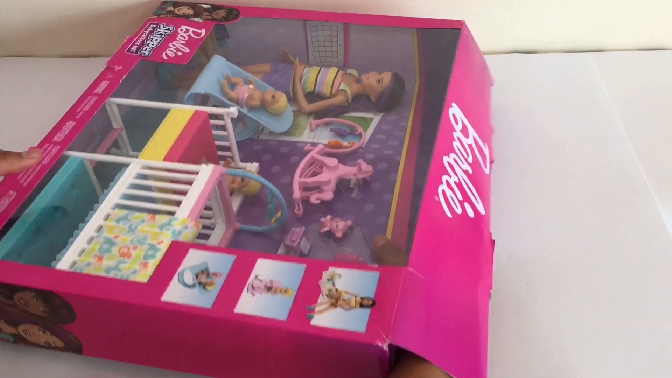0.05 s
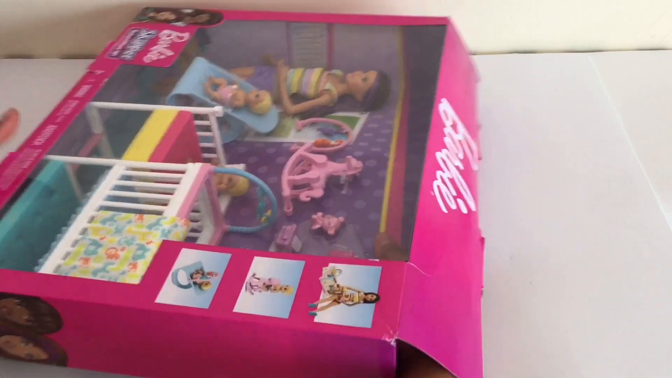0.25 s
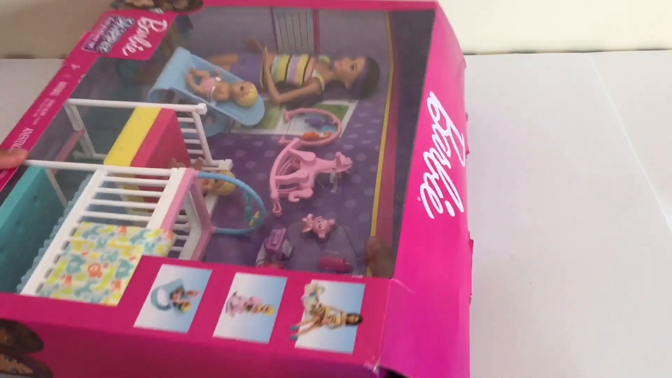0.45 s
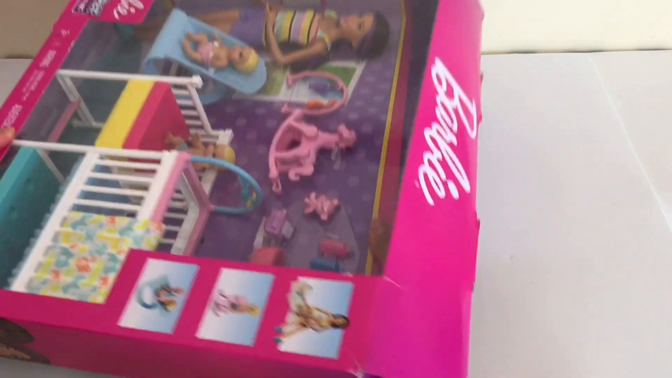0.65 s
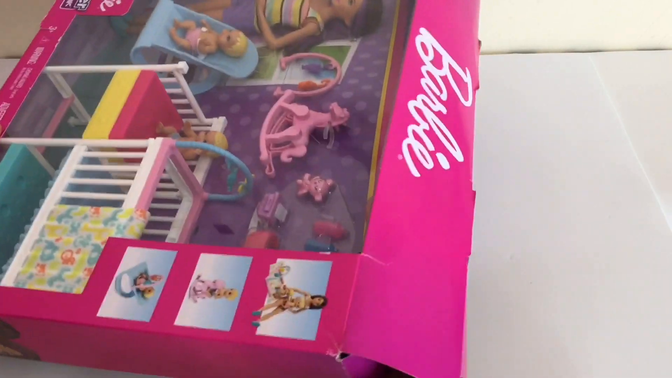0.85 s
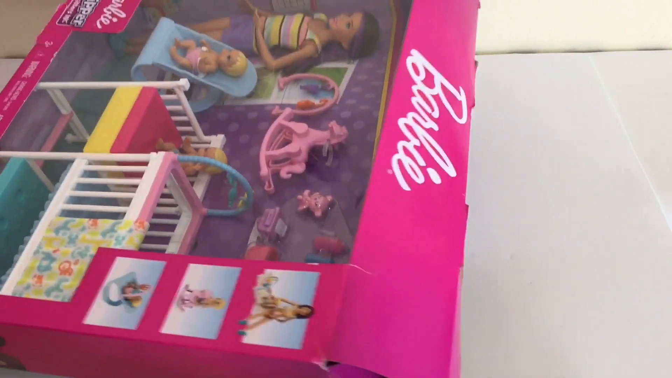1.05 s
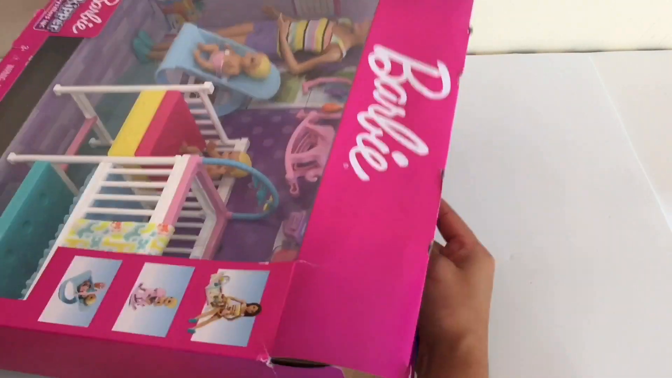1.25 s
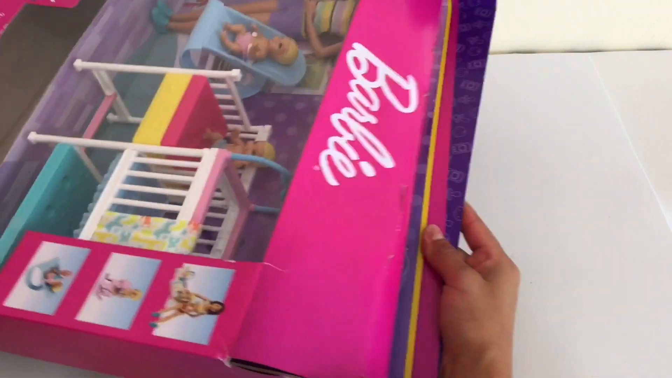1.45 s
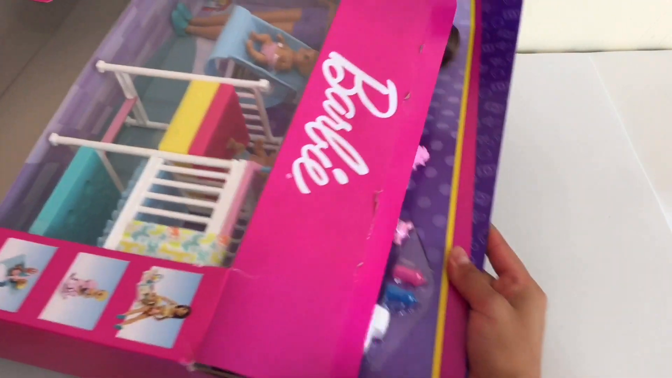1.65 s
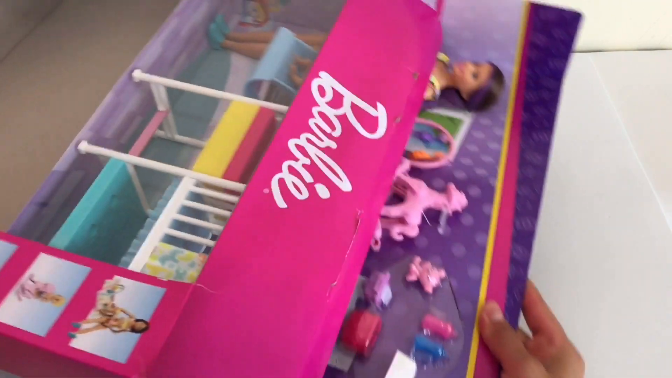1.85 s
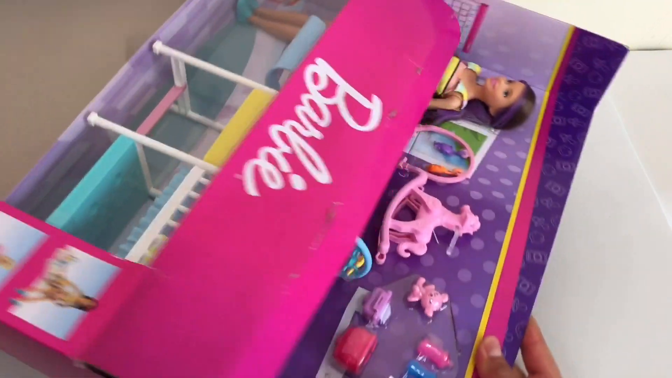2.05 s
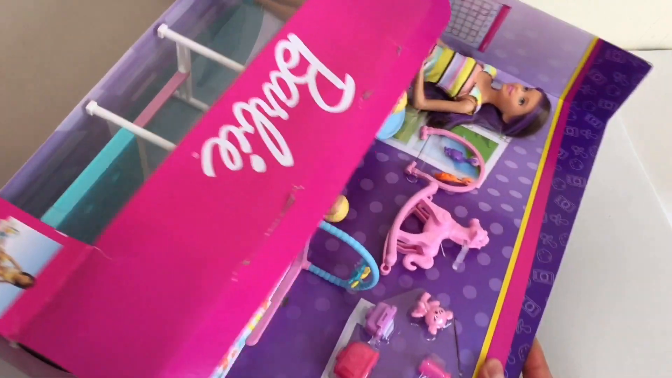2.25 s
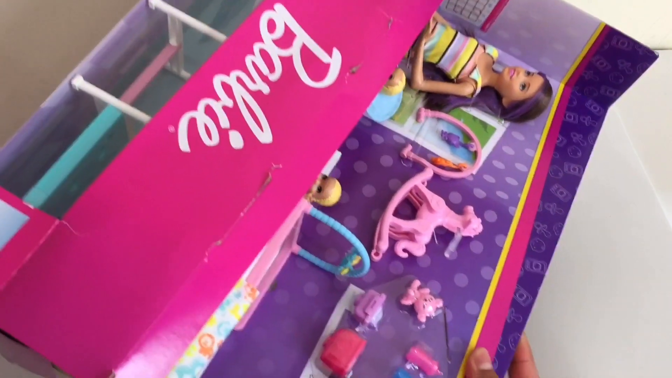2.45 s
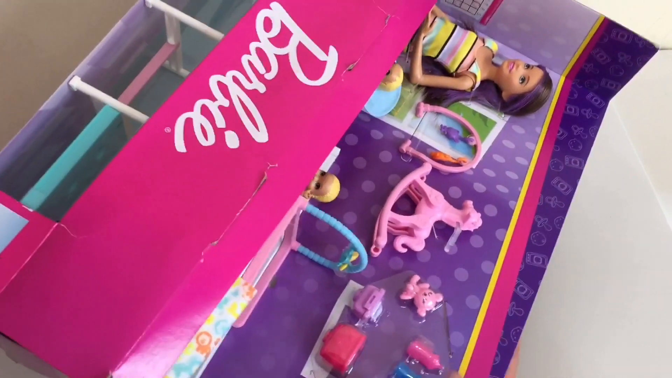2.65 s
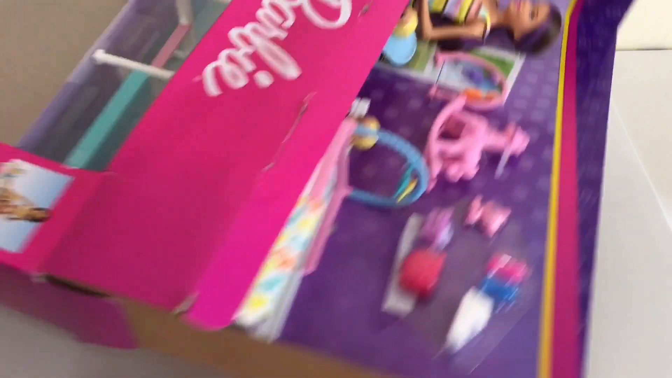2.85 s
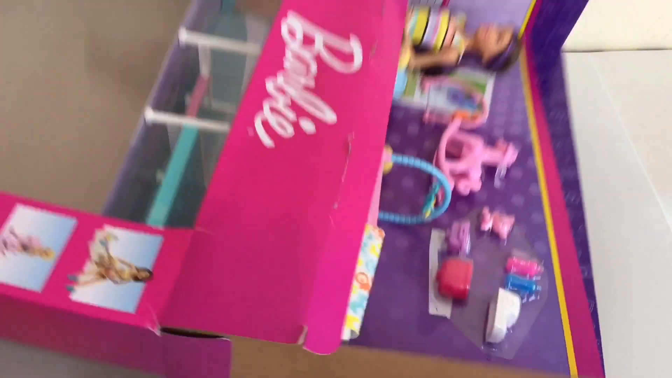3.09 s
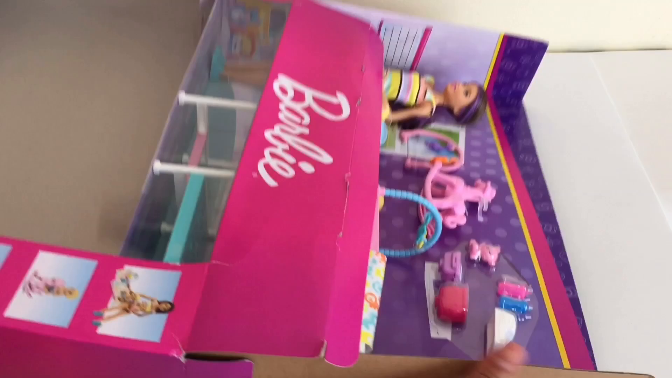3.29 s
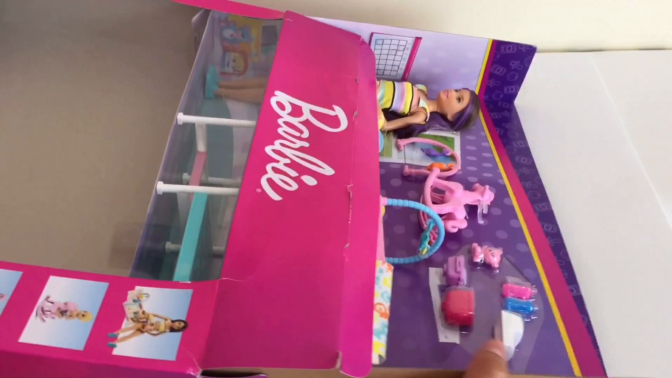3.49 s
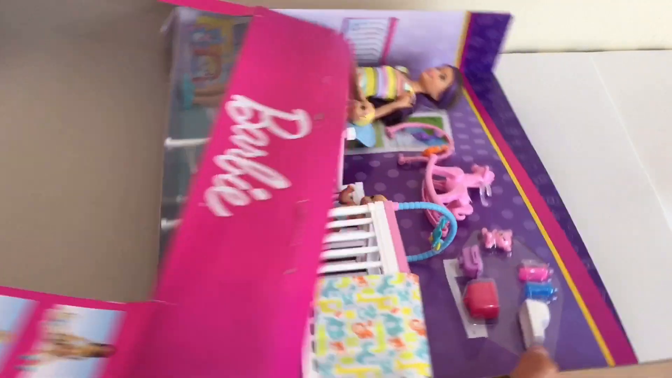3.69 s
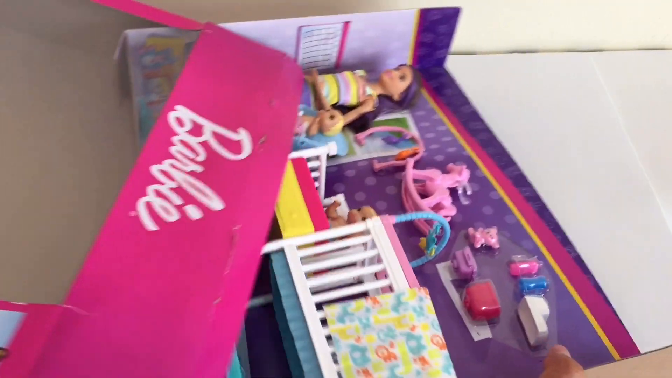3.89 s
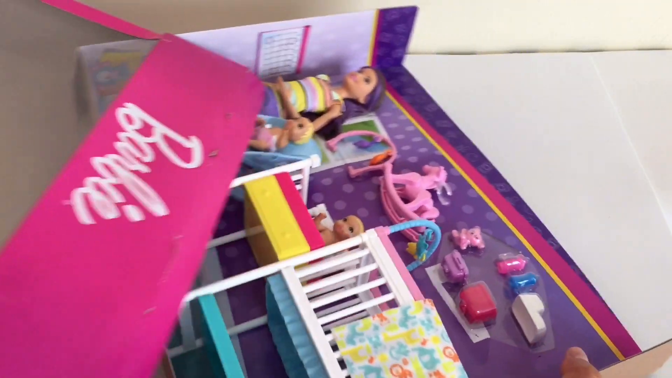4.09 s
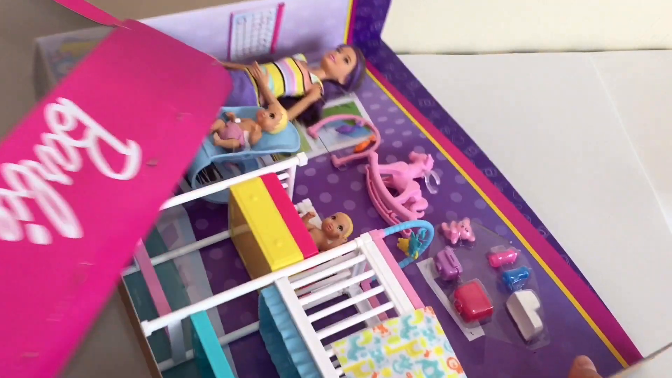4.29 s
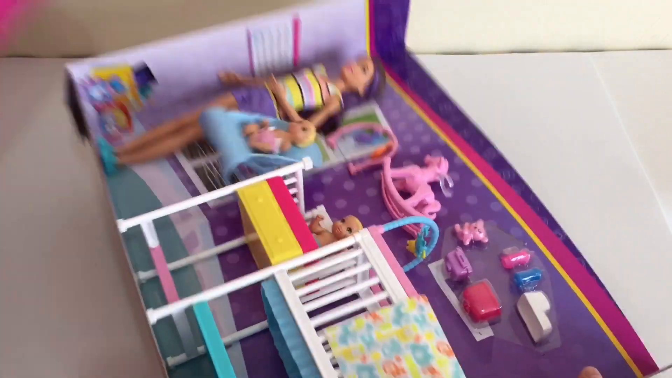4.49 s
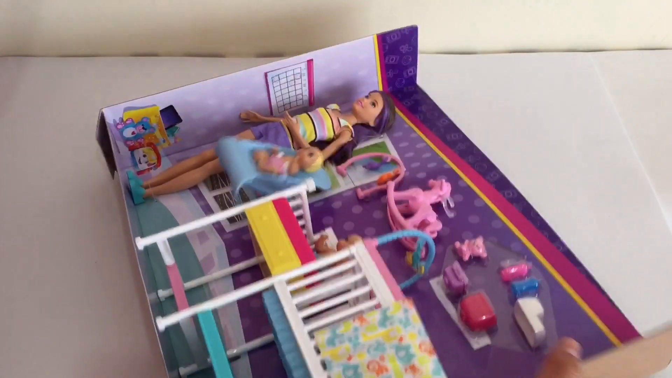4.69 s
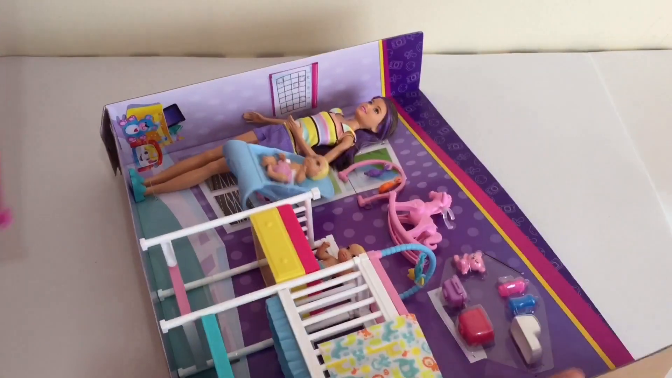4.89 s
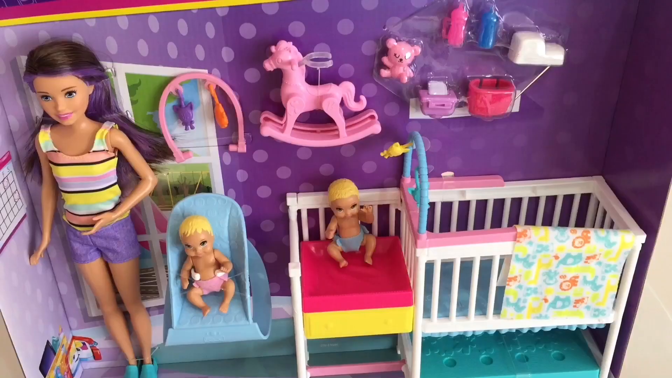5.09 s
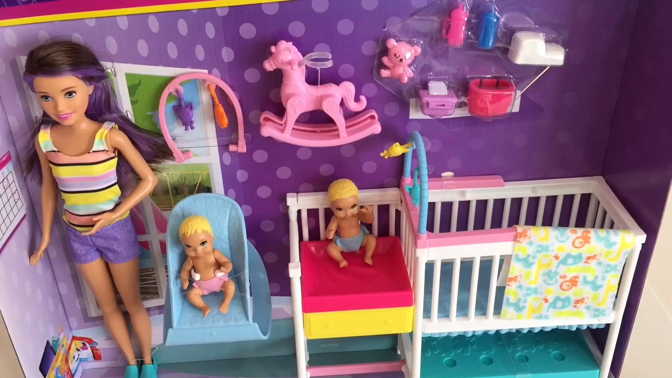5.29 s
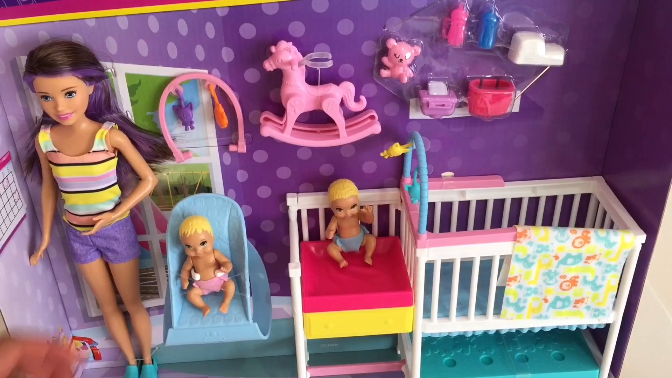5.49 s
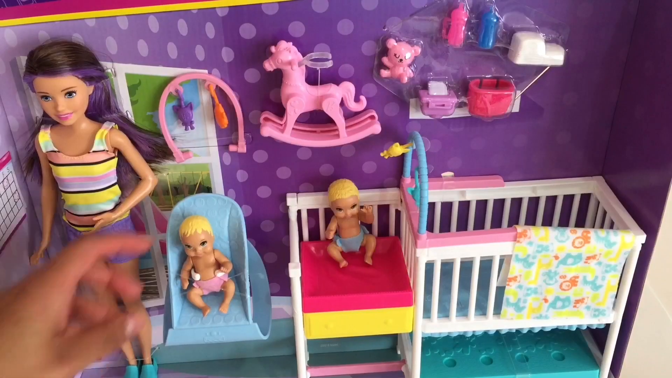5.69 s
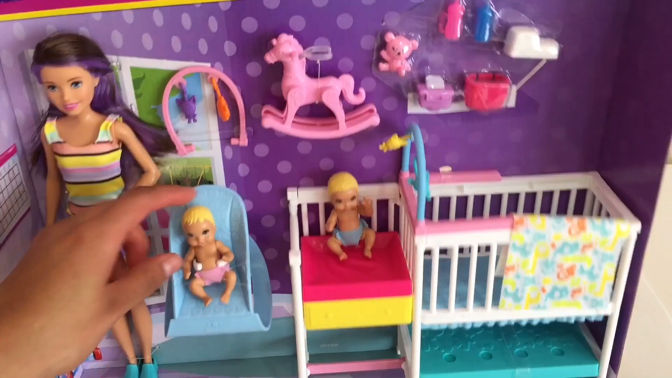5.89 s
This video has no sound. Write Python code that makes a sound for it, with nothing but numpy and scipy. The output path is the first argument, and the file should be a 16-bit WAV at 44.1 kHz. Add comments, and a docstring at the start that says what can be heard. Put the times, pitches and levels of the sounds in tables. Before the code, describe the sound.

A close recording in a small furnished room with a short reverb and low, steady room tone. From 0 to 0.75 s fingers softly rub and tap a cardboard box lid, with a tiny plastic pop near 0.1 s. From 0.77 to 1.35 s quick, drier scrapes work the flap loose, growing stronger, with a click at 1.17. The tray then scrapes unevenly from its sleeve until 2.5 s: the loudest sharp crack at 1.52, a fast triple snap around 1.87 and a hollow snap at 2.36. From 2.6 to 3.6 s come quiet plastic crinkles, short rubs, faint creaks and light knocks. Dragging resumes at 3.65 with knocks at 3.73 and 3.8, eases, then surges from 4.4 to 4.65 s into clustered clacks. Bright hard taps hit around 4.72, then fading rubs. At 5.09 s handling stops dead; near-silence follows, with faint skin brushes and a dull tap around 5.8-5.9 s.

```python
"""Opening a cardboard toy box

Small room, table top: fingers work the flap loose, the card tray scrapes out of its sleeve, catching and
snapping free; the empty sleeve knocks about and is dragged away. All sound of the handling breaks off at once,
its reverberation too; later a hand touches the tray. Scraping is stick-slip noise, knocks are cracks through
ringing panels; taps and the hollow rings of knocks are short damped tones; plastic pops, bright flicks, creaks
and low shoves join in. Room tone is steady coloured noise."""
import sys
import numpy as np
from scipy import signal
from scipy.fft import rfft, irfft, next_fast_len
from scipy.io import wavfile
from scipy.ndimage import map_coordinates

SR = 44100
rng = np.random.default_rng(int(sys.argv[2]) if len(sys.argv) > 2 else 0)


def generate_wav(signal):
    """Clip the signal to [-1, 1] and save it as 16-bit WAV at the path in sys.argv[1]."""
    frames = np.transpose(np.atleast_2d(signal))
    scaled = np.clip(frames, -1, 1) * 32767
    pcm = np.round(scaled).astype(np.int16)
    wavfile.write(sys.argv[1], SR, pcm)


N = 261954
TIME_S = np.arange(N) / SR

# long slides: (time [s], scrape level [dB], treble level [dB])
TRAY_SLIDE = [(1.39, -52, -61.5), (1.48, -32, -39.5), (1.62, -39.5, -48), (1.69, -40, -50),
              (1.81, -35.5, -41), (1.94, -40, -48), (2.1, -44.5, -57), (2.16, -40, -46),
              (2.27, -39.5, -51.5), (2.335, -33.5, -46), (2.42, -45, -54.5), (2.51, -69, -79)]
SLEEVE_DRAG = [(3.63, -58, -62), (3.7, -39, -47.5), (3.775, -39, -44.5), (3.87, -44, -53),
               (3.95, -48.5, -64.5), (4.14, -49, -59.5), (4.28, -52.5, -65.5), (4.4, -47.5, -57.5),
               (4.465, -40, -47.5), (4.5, -33, -48.5), (4.533, -27, -41), (4.58, -34.5, -45.5),
               (4.64, -44.5, -67), (4.685, -46, -70)]
# short rubbing strokes: (contact, start [s], crest [s], end [s], crest level [dB],
# panel flexing [dB re crest level], fibre hiss [dB re crest level])
STROKES = [("lid", 0, 0.13, 0.37, -51, -7, -10.5), ("lid", 0.062, 0.093, 0.125, -43, -15, -9),
           ("lid", 0.3, 0.33, 0.45, -55, -1.8, -7), ("lid", 0.457, 0.535, 0.62, -51, 6.3, -18),
           ("lid", 0.648, 0.67, 0.74, -59, -2, -9), ("flap", 0.765, 0.837, 0.85, -39.5, -15.5, -11.5),
           ("flap", 0.876, 0.911, .96, -39, -9.5, -8.5), ("flap", 0.925, 1, 1.0354, -33.5, -18.5, -4),
           ("flap", 1.08, 1.11, 1.2, -48, -7, -16), ("flap", 1.128, 1.145, 1.21, -40, -10, -7.5),
           ("flap", 1.15, 1.24, 1.31, -31, -12.5, -4.5), ("tray", 1.17, 1.255, 1.334, -33, -11, -5),
           ("tray", 1.28, 1.33, 1.384, -40, 0, -17.5), ("lid", 2.58, 2.645, 2.76, -46, -6.5, -15),
           ("sleeve", 2.8, 2.86, 2.965, -48.5, -6, -8), ("sleeve", 3.0, 3.055, 3.124, -45, -7.5, -10),
           ("sleeve", 3.12, 3.17, 3.255, -47.5, -10.5, -11.5), ("sleeve", 3.25, 3.34, 3.428, -51, -8, -5),
           ("sleeve", 3.41, 3.45, 3.64, -54.5, -3, -17), ("table", 4.695, 4.72, 4.77, -34, 0, -13),
           ("table", 4.79, 4.825, 4.91, -40.5, -3.2, -9.5), ("table", 4.87, 4.955, 4.98, -50.5, 1.2, 3.7),
           ("table", 4.97, 4.99, 5.16, -51, -7, -6.5)]
STROKE_ATTACK_S, STROKE_T60_S = 0.021, 0.12
# spectral shape of the rubbed surfaces: (frequency [Hz], gain [dB])
LID_COLOUR = [(40, -20), (160, 1), (900, -7), (1400, -13), (16000, -34.5)]
FLAP_COLOUR = [(35, -41.5), (60, -11), (339, 1), (430, -4.5), (590, 3), (732, -9), (1470, -11),
               (2080, -1.5), (2450, -8), (2850, -14.5), (3850, -16), (4860, -24.5), (7060, -20.5),
               (16000, -36.5)]
TRAY_COLOUR = [(35, -40.5), (60, -11), (160, -3), (240, -4), (430, -4), (560, -0.5), (720, -5), (946, -9.5),
               (1550, -8.5), (2470, -14), (3670, -13.5), (4860, -24.5), (5330, -20.5), (16000, -34.5)]
SLEEVE_COLOUR = [(35, -17), (60, -11), (146, -7.5), (235, -3.5), (330, 1), (470, -10), (590, 3), (730, -8),
                 (1620, -8), (4120, -23.5), (4970, -26), (16000, -34)]
DRAG_COLOUR = [(24, -35), (40, -9), (115, 2), (300, -4.5), (412, -5), (515, 2.5), (852, -3), (1270, -2.5),
               (1750, -7), (2100, -12), (3740, -16), (4930, -21), (16000, -33.5)]
SKIN_COLOUR = [(300, -13), (1200, -15), (2600, 0), (4500, -12.5), (16000, -18.5)]
# knocks and snaps of the card: (time [s], hollow body level [dB], thud [dB re body],
# brightness [dB/octave], crack sharpness [dB])
KNOCKS = [(0.243, -39.5, -6.5, -1, -10), (0.512, -45.5, 3, 1, -14), (0.783, -42, -4, 2, -6),
          (1.165, -33.5, -17.5, 2, -2), (1.521, -14, -18, 1.5, 3.5), (1.862, -28, -28, 1.8, -4),
          (1.876, -24, -10, 1.1, -0.5), (1.892, -28, -3, 0.5, -10), (2.361, -18, -13.5, 0.8, -6),
          (3.01, -45, -2, -2.5, -1), (3.289, -48, 0, 1, -18), (3.563, -44.5, -18, -0.5, -12.5),
          (3.728, -29.5, -16.5, 0, 4), (3.799, -30.5, -7.5, -2.5, -11.5), (4.102, -45.5, -8, 0, -12),
          (4.189, -45, -7, -2, -6), (4.337, -41, -15, 3, -10), (4.424, -26, -9, -0.5, -12),
          (4.484, -29.5, -10, 2, -2), (4.513, -22, -18.5, 1, -7), (4.541, -21.5, -14, -3, 2),
          (4.586, -32.5, -19, 2.5, -2), (4.617, -32, -4.5, -6, -8), (4.706, -28, 2.5, 1, -5),
          (4.717, -32, -3, 2.5, -9)]
# knock response, tray bracing the sleeve / sleeve hanging loose:
# (clack [dB re body], snap [dB re body], flutter t60 [s], flutter tail [dB])
BRACED = (-6, -14, 0.07, -18.5)
LOOSE = (-2, -16, 0.32, -25)
LOOSE_FROM_S = 2.55
# nominal modes of box panels and enclosed air: (frequency [Hz], level [dB], t60 [s])
BOX_MODES = [(110.1, -4.5, 0.017), (151, -2.5, 0.16), (350, -1, 0.07), (443, -7.5, 0.14),
             (523.3, -0.5, 0.083), (641.8, -3, 0.11), (860, -2, 0.0064), (1228, 9.5, 0.012),
             (1700, 0.5, 0.028), (2242, -1.5, 0.044), (2900, 0.5, 0.027), (3350, 3.5, .014)]
# short damped tones, taps of corners and fingertips and hollow rings of the knocks:
# (time [s], peak level [dB], pitch [Hz])
DAMPED_TONES = [(.158, -42, 365), (.246, -34.5, 523), (0.346, -36, 198), (0.405, -40, 750),
                (0.679, -41.5, 258), (1.135, -32.5, 1950), (1.166, -20, 1580), (1.872, -17.5, 362),
                (2.362, -14.5, 362), (3.061, -36.5, 115), (3.176, -38, 326), (3.446, -36.5, 1020),
                (3.926, -32.5, 1060), (4.04, -34, 637), (4.485, -16, 1160), (4.561, -18.5, 542),
                (4.617, -18.5, 940), (4.71, -16.5, 1380), (4.732, -10, 1174), (4.79, -30, 1070),
                (4.804, -23, 1070), (4.927, -27.5, 1083), (5.91, -39, 130)]
# clear plastic packaging buckles: (time [s], level [dB])
BUCKLES = [(0.104, -44), (2.627, -53.5), (2.640, -46), (2.646, -53.5)]
# nominal modes of the plastic: (frequency [Hz], level [dB], t60 [s])
PLASTIC_MODES = [(645, -8.5, 0.11), (1020, 2, 0.013), (1540, -5.5, 0.024), (2500, -9, 0.031),
                 (3440, -3.5, 0.025)]
# small bright clicks, as of a cut edge flicking past a tab: (time [s], level [dB])
FLICKS = [(1.523, -40), (1.879, -26), (2.363, -21), (3.012, -48), (3.967, -56)]
# sleeve creaks over the toys: (middle [s], length [s], level [dB], mid pitch [Hz], glide [octaves])
CREAKS = [(2.94, .24, -52, 350, -0.42), (3.212, 0.073, -51, 1398, 0.37), (3.245, 0.057, -45.5, 596, 0.04),
          (3.434, 0.12, -55, 1762, -0.8), (3.592, 0.045, -51.5, 1876, .03), (3.602, 0.071, -47, 570, -.2)]
# whole box shifts on the table: (middle [s], length [s], level [dB])
SHOVES = [(1.31, 0.14, -41), (1.534, 0.26, -43.5), (3.759, 0.28, -46.5)]
# fingers brush the tray: (middle [s], length [s], level [dB])
BRUSHES = [(5.772, 0.046, -62.5), (5.866, 0.082, -59), (5.908, 0.025, -52.5)]
# room tone spectral shape: (frequency [Hz], density [dB/Hz, relative])
AIR_COLOUR = [(20, -36), (48, 0), (64, -5.5), (256, -14.5), (500, -19.5), (6380, -27.5), (16000, -38)]
AIR_RMS_DB = -69.5
# band edges [Hz]: flex, scrape, hiss / thud, body, clack, snap
RUB_EDGES_HZ = [30, 230, 3000, 17000]
KNOCK_EDGES_HZ = [65, 250, 800, 2000, 17000]
BREAK_S = 5.088
TOP_HZ = 15900


def rubbing():
    """Fingers shift on the lid, flap scrapes finely, tray in uneven surges with catches, sleeve judders, drags."""
    fingers = strokes("lid", arch_db=8.5)
    flap = strokes("flap", arch_db=8.5)
    pull = slide(TRAY_SLIDE, flex_db=-12) + strokes("tray", arch_db=9.5)
    jogs = strokes("sleeve", arch_db=4.5)
    drag = slide(SLEEVE_DRAG, flex_db=-10) + strokes("table", arch_db=8.5)
    return (rub(fingers, LID_COLOUR, judder_db=3.5, shift_db=6, rattle_db=-17)
            + rub(flap, FLAP_COLOUR, judder_db=2, shift_db=4.5, judder_per_s=220)
            + rub(pull, TRAY_COLOUR, judder_db=1.23, shift_db=3, slips_per_s=3200, crackle_db=-9.5,
                  bend=0.1, ring_db=-25)
            + rub(jogs, SLEEVE_COLOUR, judder_db=2.3, shift_db=6, rattle_db=-20.5)
            + rub(drag, DRAG_COLOUR, judder_db=1.5, shift_db=7.5, rattle_db=-19, crackle_db=-10.5))


def strokes(contact, arch_db, hiss_steeper=1.21):
    """Gains of flex, scrape, hiss: a stroke grips, swells by arch_db to its crest, eases as much, lets go."""
    power = np.zeros((3, N))
    for kind, start_s, crest_s, end_s, db, flex_db, hiss_db in STROKES:
        if kind != contact:
            continue
        slack = np.interp(TIME_S, [start_s, crest_s, end_s], [1, 0, 1])
        attack = np.clip((TIME_S - start_s) / STROKE_ATTACK_S, 0, 1)
        grip = attack * fade(np.maximum(TIME_S - end_s, 0), STROKE_T60_S)
        scrape = grip * undb(db - arch_db * slack)
        hiss = grip * undb(db + hiss_db - hiss_steeper * arch_db * slack)
        power += np.array([undb(flex_db) * scrape, scrape, hiss]) ** 2
    return np.sqrt(power)


def slide(curve, flex_db):
    """Gains of flex, scrape, hiss in a long slide; panels flex in step with the scraping."""
    time_s, scrape_db, treble_db = np.transpose(curve)
    edge_s = np.minimum(TIME_S - time_s[0], time_s[-1] - TIME_S)
    contact = np.clip(edge_s / 0.008 + 0.5, 0, 1)  # 8 ms ramps
    return [contact * undb(np.interp(TIME_S, time_s, db))
            for db in (scrape_db + flex_db, scrape_db, treble_db)]


def rub(gains, surface, judder_db, shift_db, slips_per_s=1900, judder_per_s=50, rattle_db=-26,
        crackle_db=-11, bend=0.05, ring_db=-21, spread_db=3, smooth_db=-6):
    """Card on card: fibres catch and slip in uneven bunches, shake the panels and rattle the toys."""
    caught = rng.random(N) < slips_per_s / SR
    sizes = undb(spread_db * np.minimum(rng.exponential(size=N), 3))
    slips = unit(caught * sizes * rng.choice([-1, 1], N))
    slips = slips + undb(smooth_db) * rng.standard_normal(N)
    fibre_tears = crackle(per_s=120, t60_s=0.003)
    edge_catches = crackle(per_s=24, t60_s=0.022)
    slips = slips + undb(crackle_db) * (fibre_tears + undb(-3) * edge_catches)
    slips = slips * undb(judder_db * walk(judder_per_s))
    panel_ring = ring(BOX_MODES, TIME_S[:SR // 5], detune=0.025, scatter_db=1)
    panels = signal.fftconvolve(slips, panel_ring)[:N]
    contact = shifting(unit(slips) + undb(ring_db) * unit(panels), shift_db)
    sound = colour(contact + undb(rattle_db) * rattles(), surface)
    flex, scrape, hiss = bands(table_echo(sound), RUB_EDGES_HZ)
    parts = flex, bending(scrape, bend, per_s=12), hiss
    return sum(unit(part) * gain for part, gain in zip(parts, gains))


def crackle(per_s, t60_s, spread_db=5):
    """Card snags and tears free: sparse, short ticks of uneven size."""
    sizes = undb(spread_db * np.minimum(rng.exponential(size=N), 2))
    snags = (rng.random(N) < per_s / SR) * sizes
    envelope = signal.fftconvolve(snags, fade(TIME_S[:SR // 50], t60_s))[:N]
    return unit(envelope * rng.standard_normal(N))


def rattles(per_s=75, centre_hz=1000, reach_octaves=1.4, t60_s=0.02, spread_db=4):
    """Card edges tick over the toys at random, each contact ringing briefly at its own pitch."""
    out, t = np.zeros(N), TIME_S[:SR // 20]
    for when, size, pitch in rng.random((int(per_s * N / SR), 3)):
        hz = centre_hz * 2 ** (reach_octaves * (2 * pitch - 1))
        tick = np.sin(2 * np.pi * hz * t) * fade(t, t60_s)
        tick += np.sin(2 * np.pi * np.sqrt(3) * hz * t) * fade(t, t60_s / 2)
        add(out, undb(spread_db * min(-np.log(1 - size), 2)) * tick, when * TIME_S[-1])
    return unit(out)


def shifting(x, depth_db, per_s=22, even_above_hz=2400):
    """The contact point travels: each narrow band swells and sinks by itself, the hiss more evenly."""
    hz, time_s, cells = signal.stft(x, SR, nperseg=512)
    knots = rng.standard_normal((32, int(time_s[-1] * per_s) + 2))
    where = np.broadcast_arrays(np.log2(1 + hz / 400)[:, None] * 5, time_s * per_s)
    depth = depth_db / np.hypot(1, hz / even_above_hz)[:, None]
    gain = undb(depth * map_coordinates(knots, where, order=1))
    return signal.istft(cells * gain, SR)[1][:N]


def table_echo(x, lag_s=0.0026, sway_octaves=0.16, per_s=12, above_hz=1100, share=0.44):
    """The table mirrors the scraping; the box's height keeps changing, so a comb of peaks drifts."""
    lag = lag_s * 2 ** (sway_octaves * walk(per_s))
    treble = signal.sosfilt(signal.butter(2, above_hz, "high", fs=SR, output="sos"), x)
    return x + share * map_coordinates(treble, [(TIME_S - lag) * SR], order=1, mode="mirror")


def bending(x, share, per_s):
    """Card stiffens and slackens as it bends: variable-speed reading glides its resonances up and down."""
    return map_coordinates(x, [np.cumsum(1 + share * walk(per_s))], order=1, mode="mirror")


def knocks():
    """Every knock of the card at its moment; its own brightness tilts its upper bands up or down."""
    out = np.zeros(N)
    octaves = np.array([0, 0, 1.5, 3])
    for time_s, body_db, thud_db, brightness, crack_db in KNOCKS:
        clack_db, snap_db, flutter_t60_s, tail_db = BRACED if time_s < LOOSE_FROM_S else LOOSE
        levels_db = body_db + np.array([thud_db, 0, clack_db, snap_db]) + brightness * octaves
        add(out, knock(levels_db, crack_db, flutter_t60_s, tail_db), time_s)
    return out


def knock(levels_db, crack_db, flutter_t60_s, tail_db, ring_db=-1.5, tail_t60_s=0.22, attack_s=0.013,
          give_s=0.0031, treble_t60_s=0.26, rasp_db=-15, rasp_t60_s=0.023):
    """A caught edge lets go: a crack, the panels' ring and the dense flutter of their higher modes."""
    t = TIME_S[:SR // 3]
    flutter, fibres = rng.standard_normal((2, len(t))) * (1 - np.exp(-t / give_s))
    flutter = flutter * (fade(t, flutter_t60_s) + undb(tail_db) * fade(t, tail_t60_s))
    panels = ring(BOX_MODES, t, detune=0.035, scatter_db=6.5)
    blow = unit(flutter) + undb(ring_db) * unit(panels)
    blow = blow + undb(crack_db) * unit(crack(len(t), lag_s=0.002))
    # soft card dulls the crack; the rasp of slipping fibres reaches higher
    blow = signal.sosfilt(signal.butter(2, 4500, fs=SR, output="sos"), blow)
    blow = blow + undb(rasp_db) * unit(fibres * fade(t, rasp_t60_s))
    blow = signal.sosfilt(signal.butter(1, 3600, fs=SR, output="sos"), blow) + undb(-19.5) * blow
    thud, body, clack, snap = bands(blow, KNOCK_EDGES_HZ)
    parts = thud, body, clack, snap * fade(t, treble_t60_s)
    # level: the band's whole energy spread over attack_s
    return sum(undb(db) * part / np.sqrt(np.sum(part ** 2) / (attack_s * SR))
               for part, db in zip(parts, levels_db))


def crack(size, lag_s, jumble=0.28):
    """A click across a panel: bending waves bring treble first, bass later; lag_s applies near 1 kHz."""
    hz = np.arange(size // 2 + 1) * SR / size
    travel = 4 * np.pi * lag_s * np.sqrt(hz * 1000)
    steps = np.diff(travel, prepend=0) * (1 + jumble * rng.standard_normal(len(hz)))
    return irfft(np.exp(-1j * np.cumsum(steps)), size)


def ring(modes, t, detune, scatter_db):
    """Free ring of a sheet; every grip bends it a little, every contact point weights the modes anew."""
    out = np.zeros(len(t))
    for hz, db, t60_s in modes:
        bend, weight, sign = rng.standard_normal(3)
        tone = np.sin(2 * np.pi * hz * (1 + detune * bend) * t)
        out += np.sign(sign) * undb(db + scatter_db * weight) * fade(t, t60_s) * tone
    return out


def damped_tones(cycles=11, give_cycles=0.34, overtone_ratio=1.3, overtone_db=-10, tick_db=-13,
                 tick_cycles=20):
    """Taps and hollow knock rings: dry rasp and two tones; decay is set in cycles, so low ones last longer."""
    out, t = np.zeros(N), TIME_S[:SR // 10]
    for time_s, db, hz in DAMPED_TONES:
        tones = np.sin(2 * np.pi * hz * t)
        tones += undb(overtone_db) * np.sin(2 * np.pi * overtone_ratio * hz * t)
        rasp = unit(bands(rng.standard_normal(len(t)), [hz, 2.6 * hz], order=2)[0])
        sound = tones * fade(t, cycles / hz) + undb(tick_db) * rasp * fade(t, tick_cycles / hz)
        sound = sound * (1 - np.exp(-t * hz / give_cycles))
        add(out, undb(db) * sound / np.max(np.abs(sound)), time_s)
    return out


def buckles(crinkle_db=-3, crinkle_t60_s=0.032):
    """Thin plastic pops through, ringing its modes, and crinkles for an instant."""
    out, t = np.zeros(N), TIME_S[:SR // 16]
    for time_s, db in BUCKLES:
        crinkle = bands(rng.standard_normal(len(t)), [1500, 4500], order=2)[0] * fade(t, crinkle_t60_s)
        pop = unit(ring(PLASTIC_MODES, t, detune=0.026, scatter_db=5))
        add(out, undb(db) * unit(pop + undb(crinkle_db) * unit(crinkle)), time_s)
    return out


def flicks(t60_s=0.009, low_hz=3500, high_hz=7000):
    """A thin, bright click of band noise, gone within milliseconds."""
    out, t = np.zeros(N), TIME_S[:SR // 30]
    for time_s, db in FLICKS:
        click = unit(bands(rng.standard_normal(len(t)), [low_hz, high_hz], order=2)[0])
        add(out, undb(db) * click * fade(t, t60_s), time_s)
    return out


def creaks(width=0.14):
    """Uneven slipping drives one sleeve resonance, which glides as the free length of card changes."""
    out = np.zeros(N)
    for middle_s, length_s, db, hz, glide in CREAKS:
        progress = np.clip((TIME_S - middle_s) / length_s, -0.5, 0.5)
        phase = 2 * np.pi * np.cumsum(hz * 2 ** (glide * progress)) / SR
        tone = unit(walk(width * hz) * np.cos(phase) + walk(width * hz) * np.sin(phase))
        out += undb(db) * swell(middle_s, length_s) * tone
    return out


def shoves(low_hz=45, high_hz=125):
    """The base judders over the table top: a low rumble that swells and sinks."""
    rumble = unit(bands(rng.standard_normal(N), [low_hz, high_hz])[0])
    return rumble * sum(undb(db) * swell(middle_s, length_s) for middle_s, length_s, db in SHOVES)


def brushes():
    """Skin slides lightly over card and plastic: a smooth, faint whisk."""
    whisk = unit(colour(rng.standard_normal(N), SKIN_COLOUR))
    return whisk * sum(undb(db) * swell(middle_s, length_s) for middle_s, length_s, db in BRUSHES)


def room(x, wet_db, low_t60_s=0.29, high_t60_s=0.13, gap_s=0.0048):
    """A small furnished room: a short diffuse tail whose treble dies first."""
    t = TIME_S[:SR // 2]
    parts = bands(rng.standard_normal(len(t)), KNOCK_EDGES_HZ)
    t60s_s = np.linspace(low_t60_s, high_t60_s, len(parts))
    tail = sum(part * fade(t, t60_s) for part, t60_s in zip(parts, t60s_s)) * (t > gap_s)
    return x + undb(wet_db) * signal.fftconvolve(x, tail / np.sqrt(np.sum(tail ** 2)))[:N]


def room_tone():
    """Steady coloured noise of the quiet room."""
    return undb(AIR_RMS_DB) * unit(colour(rng.standard_normal(N), AIR_COLOUR))


def undb(db):
    """Decibels to gain."""
    return 10 ** (np.asarray(db) / 20)


def unit(x):
    """Scale to rms 1."""
    return x / np.sqrt(np.mean(x ** 2) + 1e-24)


def fade(t, t60_s):
    """Exponential decay, 60 dB down after t60_s."""
    return np.exp(-np.log(1000) * t / max(t60_s, 1e-4))


def swell(middle_s, length_s):
    """A smooth rise and fall around a moment."""
    return np.cos(np.pi * np.clip((TIME_S - middle_s) / length_s, -0.5, 0.5)) ** 2


def walk(per_s):
    """Random wandering, rms 1: straight lines between per_s random knots a second."""
    knots = rng.standard_normal(int(N / SR * per_s) + 2)
    return unit(np.interp(TIME_S * per_s, np.arange(len(knots)), knots))


def bands(x, edges_hz, order=3):
    """Split a sound into neighbouring bands."""
    return [signal.sosfilt(signal.butter(order, pair, "band", fs=SR, output="sos"), x)
            for pair in zip(edges_hz, edges_hz[1:])]


def colour(x, points):
    """Causal minimum-phase filter through (frequency [Hz], gain [dB]) points, via the cepstrum."""
    hz, db = np.transpose(points)
    size = next_fast_len(2 * N) // 2 * 2
    grid_hz = np.maximum(np.arange(size // 2 + 1) * SR / size, 1)
    cepstrum = irfft(np.log(undb(np.interp(np.log(grid_hz), np.log(hz), db))))
    cepstrum[1:size // 2] *= 2
    cepstrum[size // 2 + 1:] = 0
    return irfft(rfft(x, size) * np.exp(rfft(cepstrum)))[:N]


def add(out, sound, time_s):
    """Mix a short sound in at time_s."""
    start = int(time_s * SR)
    out[start:start + len(sound)] += sound[:N - start]


def scene():
    """Handling and its reverberation stop dead at BREAK_S; damped tones, brushes and room tone are not cut."""
    handling = rubbing() + shoves() + knocks() + flicks() + buckles() + creaks()
    handling = room(handling, wet_db=-12) * (TIME_S < BREAK_S)
    tones_and_brushes = room(damped_tones() + brushes(), wet_db=-10)
    return (handling + tones_and_brushes + room_tone())[None]


def record(dry):
    """Steep elliptic low-pass at TOP_HZ."""
    return signal.sosfilt(signal.ellip(10, 0.2, 80, TOP_HZ, fs=SR, output="sos"), dry)


dry = scene()
out = record(dry)
generate_wav(out)
```